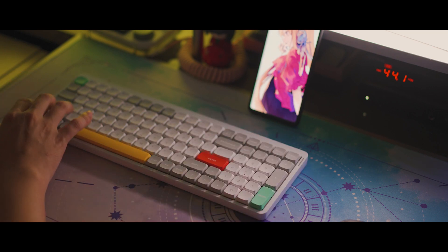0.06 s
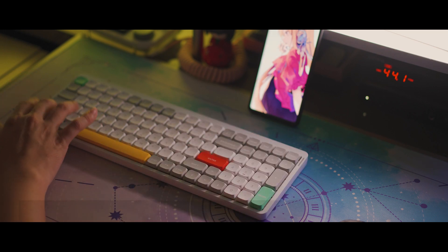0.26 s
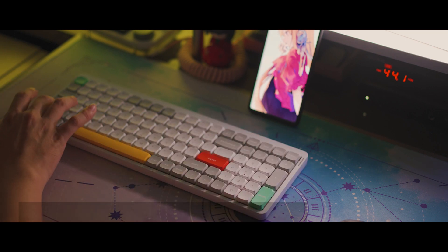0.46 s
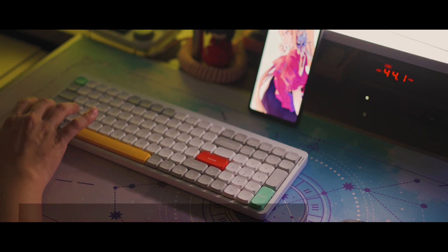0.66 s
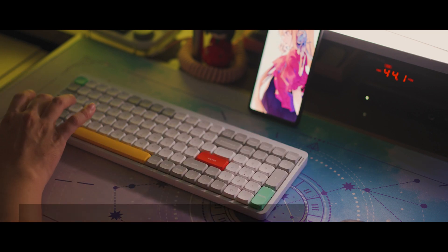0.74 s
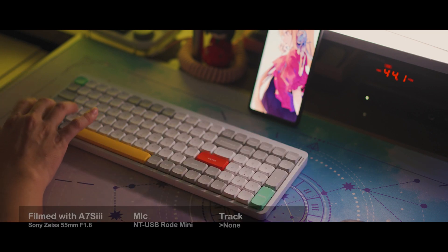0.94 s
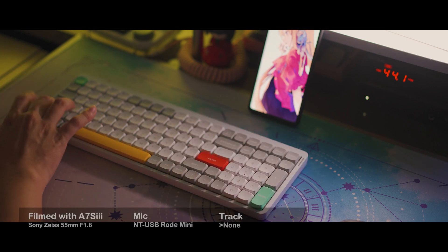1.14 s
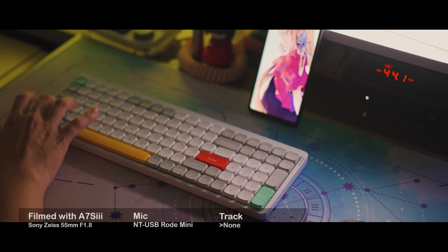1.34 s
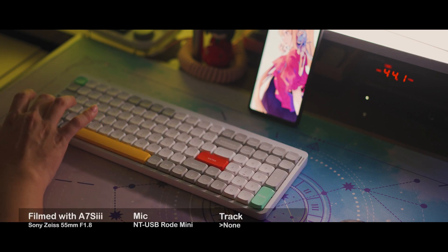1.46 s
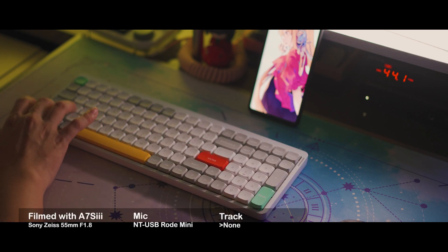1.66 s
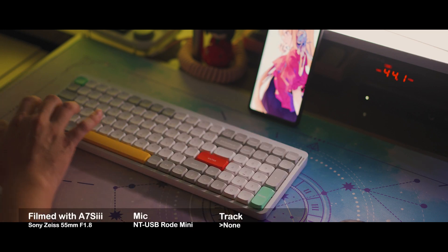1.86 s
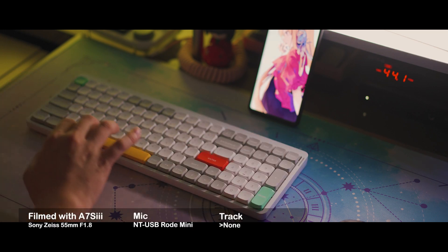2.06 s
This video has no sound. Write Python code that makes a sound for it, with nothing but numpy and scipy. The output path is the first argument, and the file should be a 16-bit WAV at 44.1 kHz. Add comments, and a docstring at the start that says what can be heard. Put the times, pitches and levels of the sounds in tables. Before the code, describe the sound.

Close up in a quiet, faintly humming room, one mechanical keyboard key clacks down and clicks back up eleven times in fast succession. The first press is hardest, and each adds a slight keycap rattle and soft desk thump.

```python
"""A low hum fills a quiet room; close to a desk microphone, one key of a low mechanical keyboard
is tapped eleven times. Each time it scrapes faintly on the way down, then bottoms out with a sharp
clack that rattles the keycap and shakes the desk. The case colours the blow, the plate rings on
faintly and the room adds a short tail. On release the spring throws the key against its top stop,
a second blow through the same case and room, and it bounces to rest."""
import sys
import numpy as np
from scipy import signal
from scipy.fft import rfft, irfft
from scipy.io import wavfile

SR = 44100
rng = np.random.default_rng(int(sys.argv[2]) if len(sys.argv) > 2 else 0)


def store_wav(level_fs):
    """Save 16-bit WAV to argv[1]."""
    pcm = np.round(np.clip(np.atleast_2d(level_fs), -1, 1) * 32767)
    wavfile.write(sys.argv[1], SR, pcm.T.astype(np.int16))


N = 92610
BLOW_SAMPLES = 8192
BINS_HZ = np.fft.rfftfreq(BLOW_SAMPLES, 1 / SR)


def amp(db):
    """Decibels to gain."""
    return 10 ** (np.asarray(db) / 20)


def read(points, hz):
    """Interpolates a table on a log-frequency axis."""
    f, value = np.transpose(points)
    return np.interp(np.log(hz + 1), np.log(f), value)


def add(mix, start_s, sound):
    """Mixes a sound in place."""
    part = mix[max(round(start_s * SR), 0):][:len(sound)]
    part += sound[:len(part)]


def click(db):
    """Minimum-phase click: the sharpest causal pulse with this spectrum."""
    log_gain = np.log(amp(np.r_[db, db[-2:0:-1]]))
    return np.fft.ifft(np.exp(np.conj(signal.hilbert(log_gain)))).real


# room noise (frequency [Hz], relative density [dB])
HUM = [(20, -19), (50, 2.5), (70, 0), (95, -19), (122, -1), (170, -12.5), (215, 0), (260, -2.5),
       (305, -1.5), (400, -11), (640, -17), (1100, -20.5), (2200, -27.5), (4000, -38), (14800, -39),
       (16000, -43)]

def room_hum(rms_db=-51):
    """Steady low room noise with a trace of hiss."""
    shape = amp(read(HUM, np.fft.rfftfreq(N, 1 / SR)))
    noise = irfft(rfft(rng.standard_normal(N)) * shape, N)
    return amp(rms_db) * noise / noise.std()


# scrape of finger and stem (frequency [Hz], level [dB])
SLIDE = [(500, -22), (1200, -26), (3000, -32), (4500, -36), (7000, -34), (15000, -47)]

def slides(nominal_travel_s=.02, ticks_per_s=440, spread_db=0.5):
    """Faint ticks while the key travels down; a harder press travels faster."""
    t = np.arange(N) / SR
    moving = sum((t > s - nominal_travel_s / amp(db) ** 2) & (t < s) for s, db, *_ in PRESSES)
    ticks = (rng.random(N) < ticks_per_s / SR) * rng.choice([-1, 1], N)
    strength = amp(spread_db * np.minimum(rng.exponential(1, N), 2))
    scrape = moving * ticks * strength / np.sqrt(ticks_per_s * nominal_travel_s)
    return signal.fftconvolve(scrape, click(read(SLIDE, BINS_HZ)))[:N]


# colour of a fully off-centre strike (frequency [Hz], gain [dB])
OFF_CENTRE = [(450, -0.5), (600, -3), (900, 1), (1040, -10.5), (1220, 4.5), (1480, 3), (1850, -4.5),
              (2200, 4), (2600, -0.5), (3200, 0), (4000, 1)]

def blow(contact, tilt, scatter_db, off_centre=0, cap_db=0, lowpass_hz=np.inf):
    """One plastic-on-plastic impact; the key never lands twice in quite the same way."""
    pivot_hz, cap_hz, cap_width_hz = 2000, 3020, 550
    db = read(contact, BINS_HZ) + tilt * np.log2((BINS_HZ + 20) / pivot_hz)
    db -= 10 * np.log10(1 + (BINS_HZ / lowpass_hz) ** 2)
    db += off_centre * read(OFF_CENTRE, BINS_HZ)
    db += cap_db * np.exp(-((BINS_HZ - cap_hz) / cap_width_hz) ** 2)
    knots_hz = np.linspace(500, 16000, 32)
    db += scatter_db * np.interp(BINS_HZ, knots_hz, rng.standard_normal(len(knots_hz)))
    return click(db)


# key hitting bottom (frequency [Hz], level [dB])
BOTTOM_OUT = [(60, -8), (200, -10.5), (330, -17), (600, -7.5), (1000, 8.5), (1800, 7), (3000, 1.5),
              (4200, 4), (6200, 1), (8300, -21.5), (11000, -18), (15500, -39.5)]
# downstrokes (time [s], level [dB], tilt [dB/octave], finger off centre [0-1])
PRESSES = [(0.2497, 6, -0.8, 0.93), (.4069, -2, -2.3, 0.3), (.556, -1.4, -1, 0.02), (0.6972, .5, -1, 0.1),
           (0.8378, -.5, -0.65, 0), (0.9813, 1, -0.4, 0), (1.1264, 0.4, -0.8, 0), (1.2676, -0.44, -1, 0),
           (1.4206, 1.35, -0.2, 0), (1.5619, 0.1, -1.4, 0.07), (1.709, -2.6, -0.75, 0)]

def presses(rattle_db=-3.5):
    """The key bottoms out: one hard downward blow, then keycap chatter."""
    out = np.zeros(N)
    for s, db, tilt, off_centre in PRESSES:
        add(out, s, -amp(db) * blow(BOTTOM_OUT, tilt, scatter_db=0.44, off_centre=off_centre))
        add(out, s, amp(db + rattle_db) * rattle())
    return out


# keycap chatter (frequency [Hz], level [dB])
RATTLE = [(1000, -16), (3000, -7), (4600, -11.5), (6400, -12.5), (8500, -16.5), (10800, -19.5),
          (15500, -27)]

def rattle(rise_s=0.00066, t60_s=.02):
    """The loose keycap chatters brightly just after a blow."""
    t = np.arange(BLOW_SAMPLES) / SR
    burst = rng.standard_normal(BLOW_SAMPLES) * np.minimum(t / rise_s, 1) * amp(-60 * t / t60_s)
    return signal.fftconvolve(burst / np.linalg.norm(burst), click(read(RATTLE, BINS_HZ)))


def ring(modes):
    """One decaying sine per mode."""
    t = np.arange(SR) / SR
    return sum(amp(db - 60 * t / t60) * np.sin(2 * np.pi * hz * t) for hz, db, t60 in modes)


# desk modes (frequency [Hz], level [dB], t60 [s])
DESK_MODES = [(71.65, -46, 0.47), (59.4, -49.5, .4), (248, -55, 0.6)]

def desk(growth_db_per_db=.3):
    """Each press gives the desk a low thump, which grows only a little with strength."""
    out = np.zeros(N)
    for s, db, *_ in PRESSES:
        add(out, s, amp(growth_db_per_db * db) * ring(DESK_MODES))
    return out


# peaks (+) of keycap and case, and notches (-) in the clack as heard at the microphone
# (centre [Hz], width [Hz], gain [dB])
PEAKS_AND_NOTCHES = [(577, 148, 10.5), (767, 29.5, -20.5), (978.4, 80, 9.5), (1176, 48, -7.5),
                     (1437, 44, 2), (1587, 34, 4.5), (1642, 17.4, -15.5), (1782, 161, 6.5), (2090, 160, 5),
                     (2215, 32, -1), (3062, 413, 10.5), (4540, 213, 7), (4990, 177, -15), (7480, 100, 6.5)]
# plate modes (frequency [Hz], level [dB], t60 [s])
PLATE_MODES = [(981.7, -57, 0.32), (1402, -59.5, 0.22), (1570, -62.5, 0.25), (1758, -65, 0.25),
               (2870, -67.5, .25), (4760, -71, .2)]

def case(key):
    """The keyboard's body as heard at the microphone: peaks, notches and faint rings of the plate."""
    db = 0
    for centre_hz, width_hz, gain_db in PEAKS_AND_NOTCHES:
        detuning = (2 * (BINS_HZ - centre_hz) / width_hz) ** 2
        peak, notch = amp(2 * max(gain_db, 0)), amp(2 * max(-gain_db, 0))
        db += 10 * np.log10((detuning + peak) / (detuning + notch))
    body = ring(PLATE_MODES)
    add(body, 0, click(db))
    return signal.fftconvolve(key, body)[:N]


# diffuse tail (frequency [Hz], level [dB], t60 [s])
ROOM_TAIL = [(200, -2, .4), (600, -6.5, .35), (1000, -16, 0.12), (1460, -11, 0.24), (3000, -10, 0.297),
             (4300, -15.5, 0.34), (5500, -22.5, 0.27), (7800, -5, .3), (13880, -22.5, .22)]
# reflections off things on the desk (delay [s], level [dB], band centre [Hz])
ECHOES = [(.0104, -19, 10000), (.0195, -32, 1416), (.0217, -24.5, 1600), (.0248, -26, 1400)]

def room(key, rise_s=0.0041):
    """A short diffuse tail and a few near reflections."""
    hz, t, noise = signal.stft(rng.standard_normal(SR), SR, nperseg=256)
    bands = np.array(ROOM_TAIL)
    level_db = read(bands[:, [0, 1]], hz)[:, None]
    t60_s = read(bands[:, [0, 2]], hz)[:, None]
    unit_energy = np.sqrt(2 * np.log(1000) / (t60_s * SR))
    decaying = noise * amp(level_db - 60 * t / t60_s) * unit_energy
    onset = np.minimum(np.arange(SR) / SR / rise_s, 1) ** 2
    response = signal.istft(decaying, SR, nperseg=256)[1][:SR] * onset
    for delay_s, db, centre_hz in ECHOES:
        ratio = (hz + 20) / centre_hz
        add(response, delay_s, click(db - 10 * np.log10(1 + (ratio - 1 / ratio) ** 2)))
    return signal.fftconvolve(key, response)[:N]


# key hitting its top stop (frequency [Hz], level [dB])
TOP_STOP = [(60, -30), (200, -5), (330, -15.5), (600, -9), (1150, 10.5), (2100, -2.5), (2500, -3),
            (3200, -5), (3800, -16.5), (6400, -8), (8300, -27.5), (10500, -12.5), (15500, -36.5)]
# upstrokes (time [s], level [dB], tilt [dB/octave], keycap ring [dB], rebound gap [s], rebound [dB])
RELEASES = [(.3296, -2.5, 0, 3, .00266, -1), (0.484, -3, -0.4, 0, .00271, -4.5),
            (0.6214, -1, 0.5, 1, .00319, -6), (0.758, 0.25, 0.5, 1.5, .00338, -2.5),
            (0.9033, -1.5, 0.6, -20, .003, -6.5), (1.0455, 0.7, 0.6, 3.9, .00337, -3),
            (1.1926, -0.1, .4, 4, .00277, -4), (1.3336, 0.3, 0.3, -10.5, .00323, -10.5),
            (1.4779, 0, 0.8, -13, .00287, -6.5), (1.627, 0.5, 1, -15, .00281, -6),
            (1.8064, -6, -0.3, 4.9, .00228, -2.5)]

def releases(scatter_db=1.43, rattle_db=-1, rattle_db_per_db=1.07, gap_ratio=0.62, bounce_step_db=-6):
    """The spring throws the key against its top stop; three bounces follow, each sooner and softer."""
    out = np.zeros(N)
    for s, db, tilt, cap_db, gap_s, rebound_db in RELEASES:
        add(out, s, amp(db) * blow(TOP_STOP, tilt, scatter_db, cap_db=cap_db))
        add(out, s, amp(rattle_db_per_db * db + rattle_db) * rattle())
        delays_s = np.cumsum(gap_s * gap_ratio ** np.arange(3))
        for k, delay_s in enumerate(delays_s):
            bounce = blow(TOP_STOP, tilt, scatter_db, cap_db=cap_db, lowpass_hz=4940)
            add(out, s + delay_s, amp(db + rebound_db + k * bounce_step_db) * bounce)
    return out


def scene():
    """Key, desk and room at one microphone."""
    key = slides() + presses() + releases()
    return (case(key) + room(key) + desk() + room_hum())[None]


def record(dry, low_cut_hz=50, band_limit_hz=16200):
    """The microphone's low cut and the recorder's band limit."""
    highpass = signal.butter(6, low_cut_hz, "highpass", fs=SR, output="sos")
    lowpass = signal.firwin(255, band_limit_hz, window=("kaiser", 9), fs=SR)
    return signal.oaconvolve(signal.sosfilt(highpass, dry), lowpass[None], "same")


dry = scene()
out = record(dry)
store_wav(out)
```